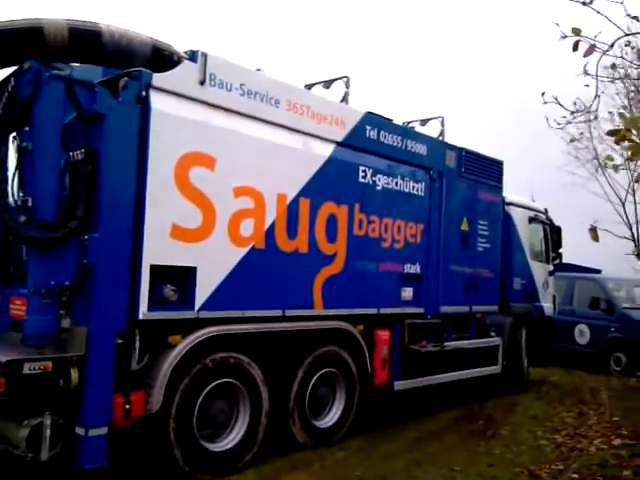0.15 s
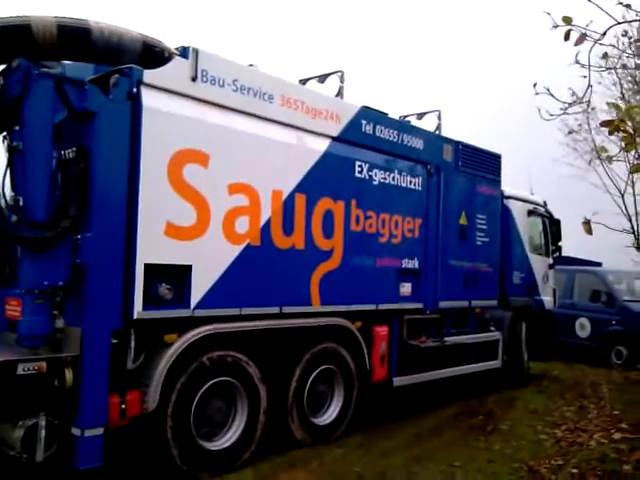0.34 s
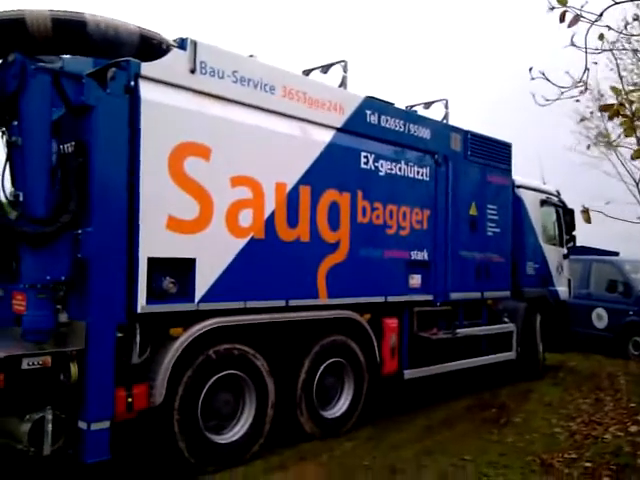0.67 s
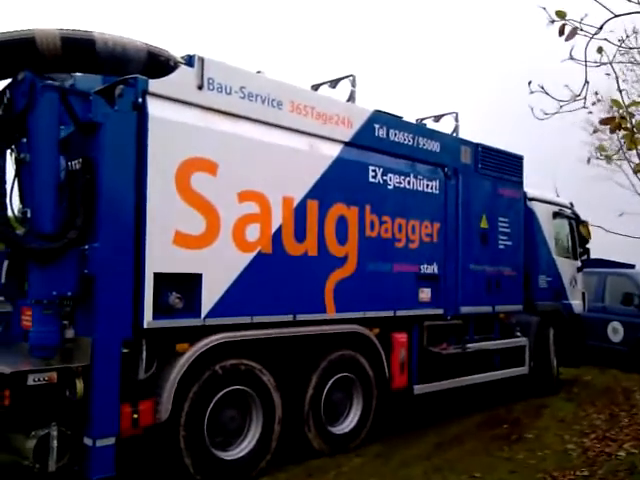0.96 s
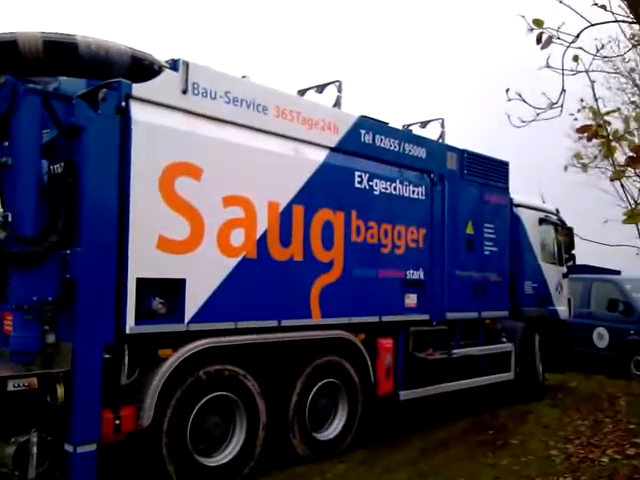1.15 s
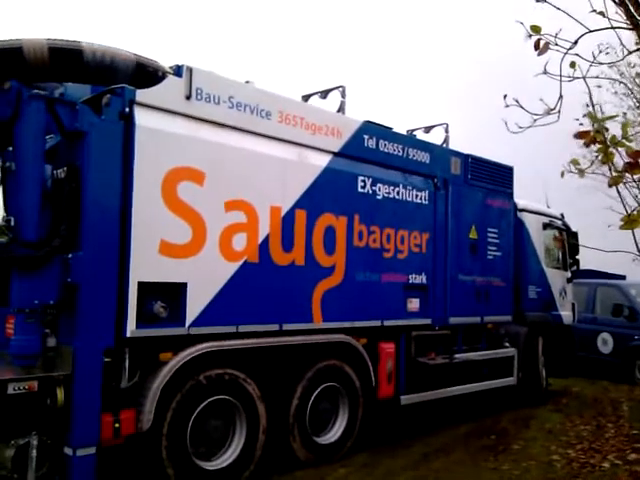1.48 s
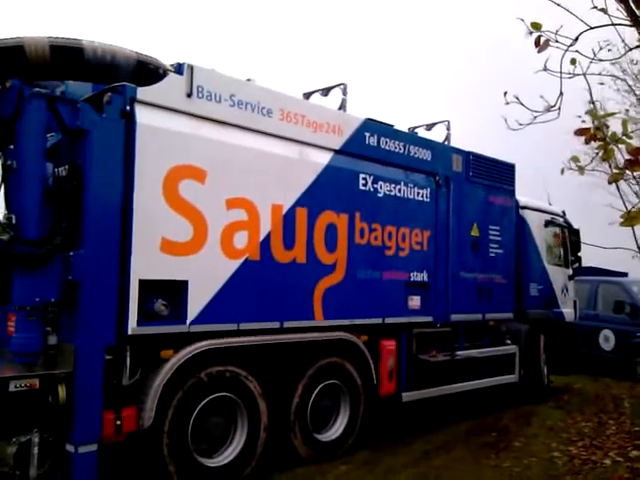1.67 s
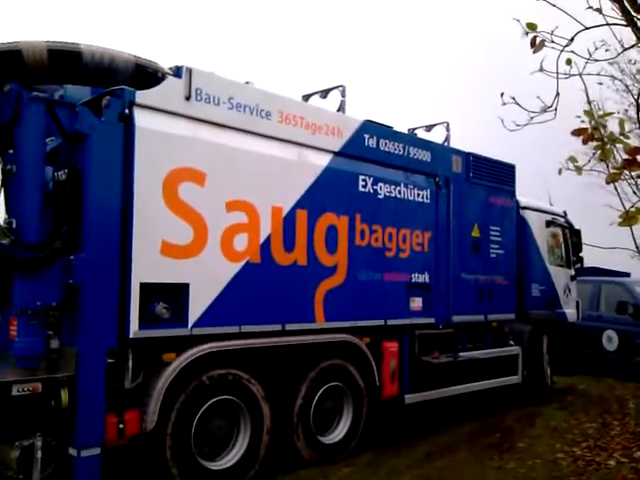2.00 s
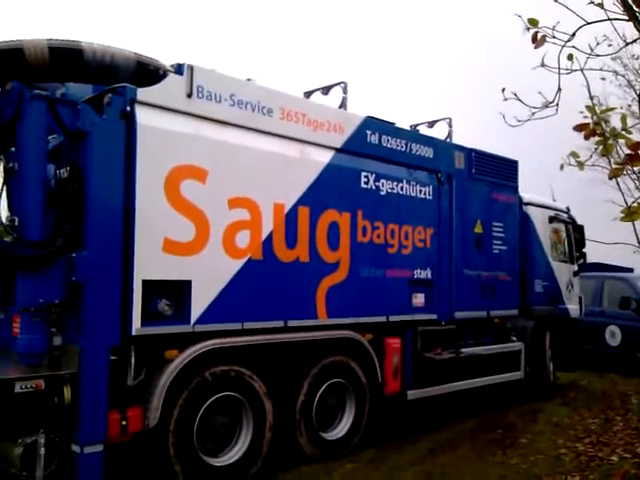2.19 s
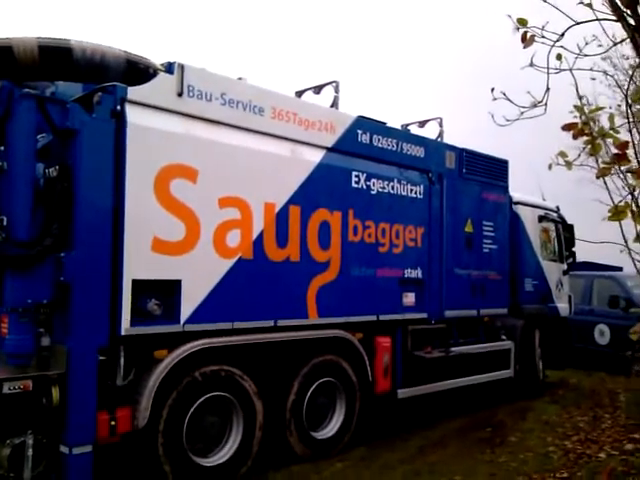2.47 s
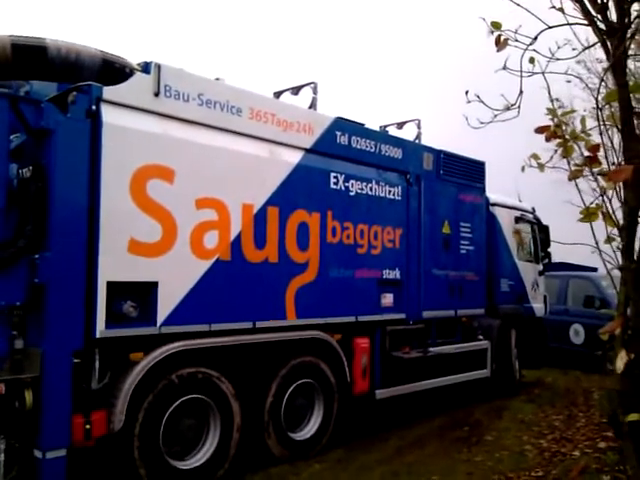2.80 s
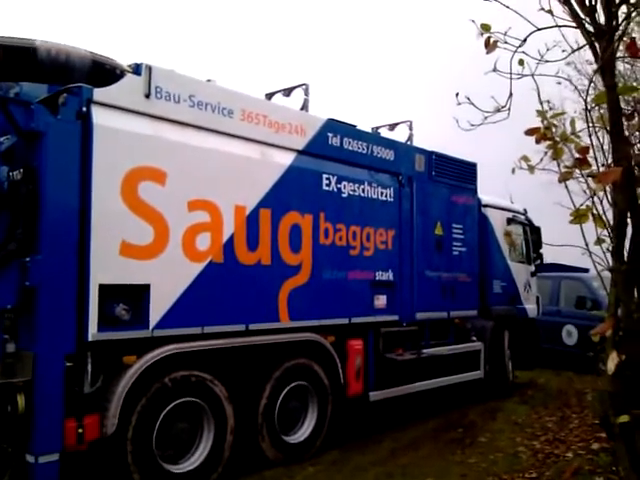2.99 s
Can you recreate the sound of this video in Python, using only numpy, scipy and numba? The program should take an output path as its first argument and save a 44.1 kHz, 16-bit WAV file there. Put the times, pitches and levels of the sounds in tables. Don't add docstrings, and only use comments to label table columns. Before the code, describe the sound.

A vacuum excavator's loud engine and fan drone, with hissing sand and hard stone clatter

```python
import sys
import numpy as np
from scipy import signal
from scipy.io import wavfile
from scipy.ndimage import uniform_filter1d
from numba import njit

SR = 44100
rng = np.random.default_rng(int(sys.argv[2]) if len(sys.argv) > 2 else 0)


def to_wav(sig):
    pcm = np.clip(np.atleast_2d(sig), -1, 1) * 32767
    pcm = np.round(pcm).astype(np.int16)
    wavfile.write(sys.argv[1], SR, pcm.T)


def how_loud(loudness_db):
    steps = np.asarray(loudness_db, float) / 20
    return 10 ** steps


N = 138474


@njit
def svf(x, hz, width):
    y, band, low = np.empty(len(x)), 0., 0.
    g, damping = np.tan(np.pi * hz / SR), width / hz
    for i in range(len(x)):
        v = (band + g * (x[i] - low)) / (1 + g * (g + damping))
        band, low = 2 * v - band, low + 2 * g * v
        y[i] = damping * v
    return y


def resonate(x, hz, width):
    hz, width = float(hz), float(width)
    return unit(svf(svf(x, hz, width), hz, width))


def unit(x):
    return x / np.sqrt(np.mean(x ** 2))


def walk(rate):
    hold = int(SR / rate)
    steps = np.repeat(rng.standard_normal(N // hold + 1), hold)
    return unit(uniform_filter1d(uniform_filter1d(steps, hold), hold)[:N])


def column(table, t, k):
    rows = np.array(table, float)
    return np.interp(t, rows[:, 0], rows[:, k])


def tone(hz, db):
    return np.sqrt(2) * how_loud(db) * np.sin(2 * np.pi * np.cumsum(hz) / SR)


# f/Hz, level/dB [dB per Hz]
ROAR_SPECTRUM = [(30, -20.5), (90, -11), (230, -11), (400, -18), (600, -14.5), (1020, -18), (1950, -15),
                 (2800, -21.5), (3500, -23.5)]
ROAR_DB, ROAR_SWELL_DB, ROAR_FLICKER_DB = -24.5, .15, 1.1
FIRING_HZ, FIRING_DB, FIRING_DEPTH = 104.9, -43.5, 0.26


def engine(t):
    roar, swell = 0, walk(1.7)
    table_hz, table_db = np.array(ROAR_SPECTRUM, float).T
    throb = 1 + FIRING_DEPTH * np.sin(2 * np.pi * FIRING_HZ * t + 0.5 * walk(3.4))
    for hz in 32 * 2 ** (np.arange(22) / 3):
        db = np.interp(np.log(hz), np.log(table_hz), table_db) + 10 * np.log10(hz)
        band = resonate(rng.standard_normal(N), hz, hz / 3)
        roar = roar + how_loud(db + ROAR_SWELL_DB * swell + ROAR_FLICKER_DB * walk(16)) * band
    firing = tone(FIRING_HZ + 1.5 * walk(4), FIRING_DB + 3 * walk(5))
    return unit(roar * throb) * how_loud(ROAR_DB) + firing


# f/Hz, level/dB [rms], wander/Hz, wobble/dB
MACHINE_TONES = [(481, -35, 1.5, 1.6), (809, -47, 3, 2.1), (962, -43, 3, 2.1), (1443, -46, 4, 2.1),
                 (1881, -32.5, 4, 2.1), (2357, -47, 5, 3)]


def pump_and_fan():
    hum = 0
    for hz, db, wander_hz, wobble_db in MACHINE_TONES:
        hum = hum + tone(hz + wander_hz * walk(25), db + wobble_db * walk(12))
    return hum


# t/s, f/Hz, level/dB [rms]
TURBO_PATH = [
    (0, 2170, -36),
    (.3, 2115, -32.5),
    (.72, 2010, -28),
    (1.45, 2005, -30),
    (2.1, 1935, -33),
    (2.4, 1995, -31),
    (2.55, 2115, -33),
    (2.88, 2150, -34),
    (3.14, 2075, -34),
]
TURBO_WANDER_HZ, TURBO_FLUTTER, TURBO_FLUTTER_PER_S = 9, .7, 60


def turbo(t):
    pitch = column(TURBO_PATH, t, 1) + TURBO_WANDER_HZ * walk(40)
    whistle = tone(pitch, column(TURBO_PATH, t, 2))
    return whistle * unit(1 + TURBO_FLUTTER * walk(TURBO_FLUTTER_PER_S))


def rattle(body, per_s, scatter_db, surge_db):
    out, surge = 0, walk(22.8)
    for hz, width, db in body:
        hit = rng.random(N) < per_s / SR
        size = how_loud(scatter_db * rng.exponential(size=N))
        grains = hit * rng.standard_normal(N) * size
        ring = resonate(grains, hz, 1.7 * width)
        out = out + how_loud(db + surge_db * (surge + 1.5 * walk(35))) * ring
    return unit(out)


# t/s, sand level/dB, clod level/dB
SOIL_FLOW = [(0, -20.5, -25.5), (.25, -27.5, -22.5), (.55, -18.5, -79.5), (.78, -17.5, -22),
             (.87, -15.5, -50), (.97, -14.5, -24), (1.1, -13, -27.5), (1.16, -14.5, -15.5), (1.3, -17, -13),
             (1.42, -20, -21.5), (1.51, -17.5, -14), (1.6, -21, -14), (1.72, -18, -19), (1.89, -20, -14),
             (1.94, -28.5, -22.5), (2.06, -28, -26.5), (2.5, -32.5, -30.5), (3.14, -23.5, -37.5)]
# f/Hz, width/Hz, level/dB
HOSE_WALL = [(1288, 450, -3), (1900, 450, -1.5), (2320, 600, -17.5), (3248, 400, -3.5), (600, 210, -10)]
# f/Hz, width/Hz, level/dB
TANK_SHELL = [(150, 80, -13), (232.8, 20, -8), (247, 130, -3.5), (528, 200, -1.5), (795, 330, 2.5),
              (1253, 170, 1), (1900, 400, 1)]


def soil(t):
    sand = rattle(HOSE_WALL, per_s=2500, scatter_db=2.6, surge_db=.9)
    clods = rattle(TANK_SHELL, per_s=900, scatter_db=3, surge_db=1.3)
    return how_loud(column(SOIL_FLOW, t, 1)) * sand + how_loud(column(SOIL_FLOW, t, 2)) * clods


# t/s, peak level/dB, ring f/Hz
STONE_HITS = [(.055, -2.5, 1750), (.769, -2.5, 1372), (0.911, -5, 1900), (0.929, -7.5, 2010),
              (0.959, -4, 1700), (0.999, -5, 1800), (1.153, -2.5, 1786), (1.184, -5, 1128),
              (1.191, -10, 1280), (1.313, -2.5, 1320), (1.393, -5.5, 1505), (1.404, -1, 1254),
              (1.4167, 1, 1320), (1.454, -2, 700), (1.462, -6, 1376), (1.592, -1, 1165),
              (1.601, -4.5, 1340), (1.626, -0.5, 1260), (1.642, -6, 3200), (1.649, -7.5, 1830),
              (1.657, -7, 3170), (1.684, -4, 3140), (1.696, -6, 3050), (1.711, -1, 1236),
              (1.738, -1.5, 1870), (1.777, -3.5, 1225), (1.795, -0.5, 1290), (1.847, -2.5, 1236),
              (1.883, -6, 1850), (2.907, -12.5, 2090)]
STONE_DB, STONE_HALF_S = -2.5, .001
STONE_TAIL_DB, STONE_TAIL_S = -7, .012


def stones(t):
    out = np.zeros(N)
    noise = unit(svf(rng.standard_normal(N), 1200., 1800.))
    for at, db, hz in STONE_HITS:
        span = slice(int((at - .01) * SR), int((at + .08) * SR))
        since = t[span] - at
        ring = np.cos(2 * np.pi * hz * since) * np.exp(-(since / STONE_HALF_S) ** 2 / 2)
        tail = noise[span] * (since > 0) * np.exp(-since / STONE_TAIL_S)
        out[span] += how_loud(db + STONE_DB) * (ring + how_loud(STONE_TAIL_DB) * tail)
    return out


WAKE_DB, WAKE_S = 1.5, 0.014


def wake(t):
    rush = sum(how_loud(db) * np.exp(-((t - at) / WAKE_S) ** 2) for at, db, hz in STONE_HITS)
    return how_loud(WAKE_DB * rush)


STREAM_LIMIT = .49
# f/Hz, width/Hz, depth [0-1]
GROUND_NOTCH = (390, 71, 0.25)


def scene():
    t = np.arange(N) / SR
    rush = wake(t)
    stream = engine(t) + pump_and_fan() + turbo(t) + rush * soil(t)
    limit = STREAM_LIMIT * rush
    rounded = stream / (1 + (stream / limit) ** 4) ** .25
    mix = rounded + stones(t)
    hz, width, depth = GROUND_NOTCH
    return (mix - depth * svf(mix, float(hz), float(width)))[None]


def steep(x, hz):
    return signal.sosfilt(signal.cheby1(14, .5, hz, fs=SR, output="sos"), x)


PHONE_RATE_HZ, TOP_HZ = 8000, 3737
MIRROR_DB, MIRROR_TOP_HZ = -21.5, 4330
CEILING, KNEE = .67, 3


def band_limit(x):
    return signal.sosfilt(signal.butter(12, 15830, fs=SR, output="sos"), x)


def record(dry):
    x = steep(dry, TOP_HZ)
    mirror = 2 * x * np.cos(2 * np.pi * PHONE_RATE_HZ * np.arange(N) / SR)
    x = x + how_loud(MIRROR_DB) * steep(mirror, MIRROR_TOP_HZ)
    over = np.maximum(np.abs(x) - CEILING, 0)
    kept = np.tanh(KNEE * over) / KNEE / 4
    mix = x - np.sign(x) * (over - kept)
    return band_limit(mix)


dry = scene()
out = record(dry)
to_wav(out)
```